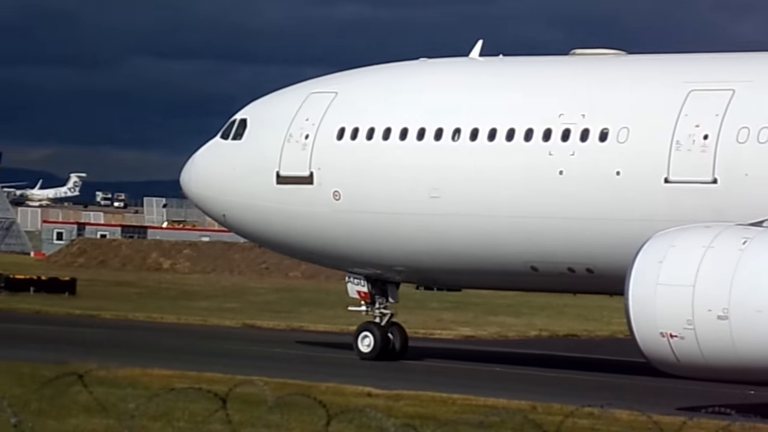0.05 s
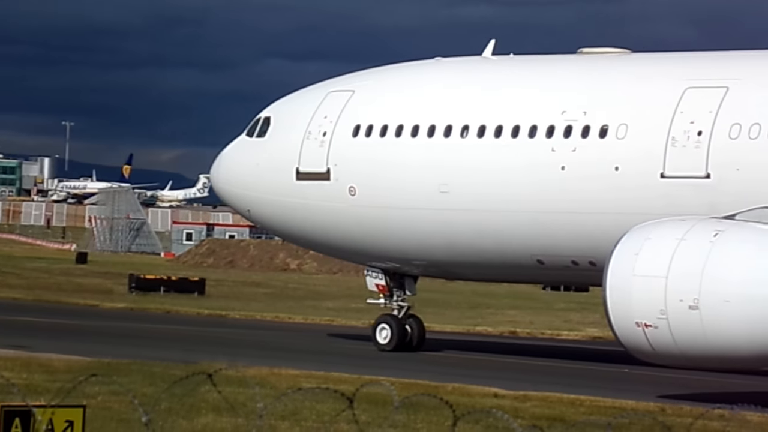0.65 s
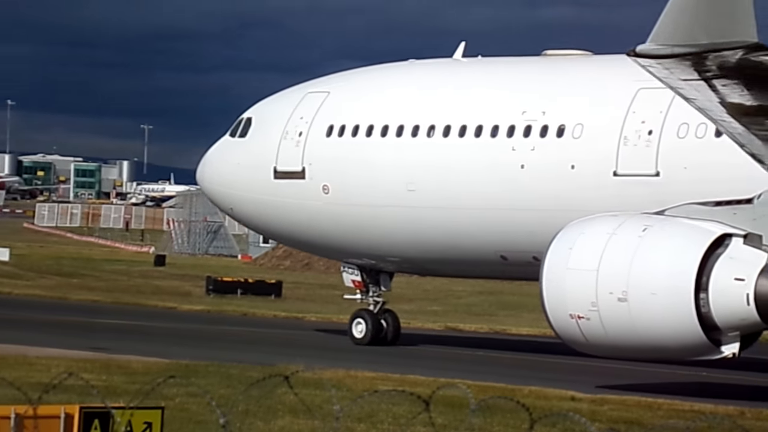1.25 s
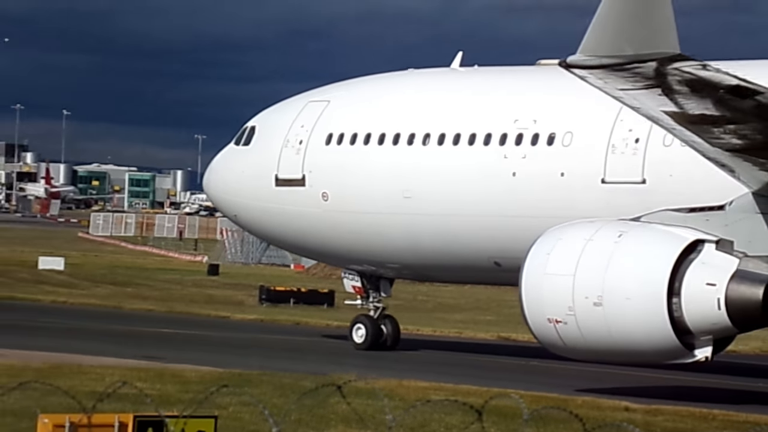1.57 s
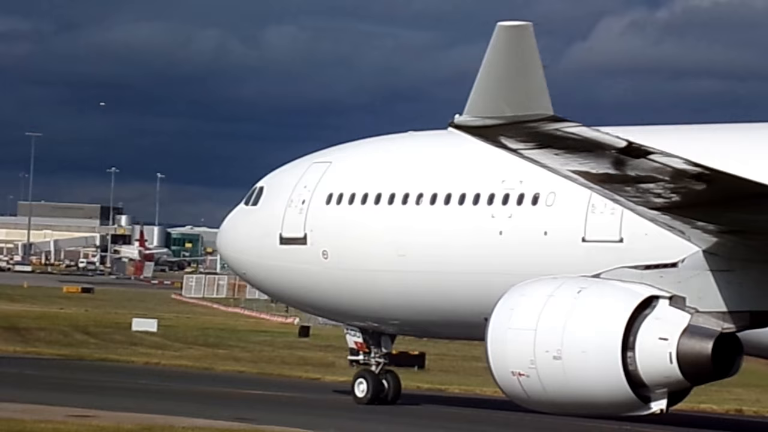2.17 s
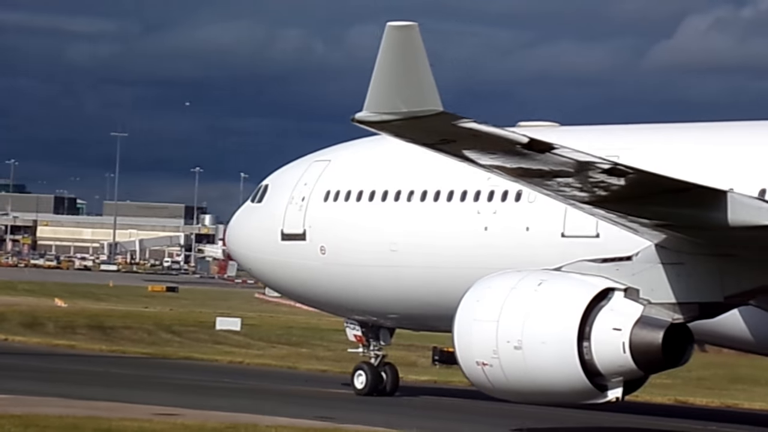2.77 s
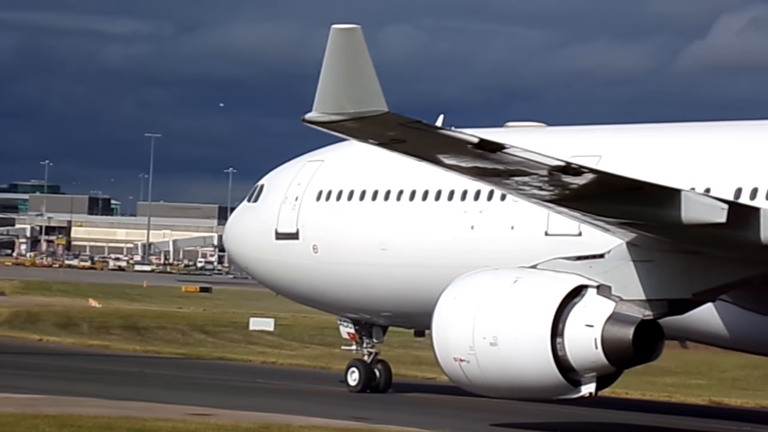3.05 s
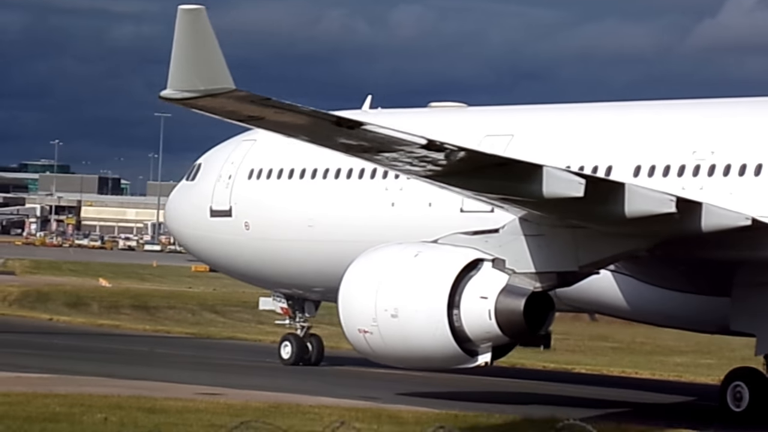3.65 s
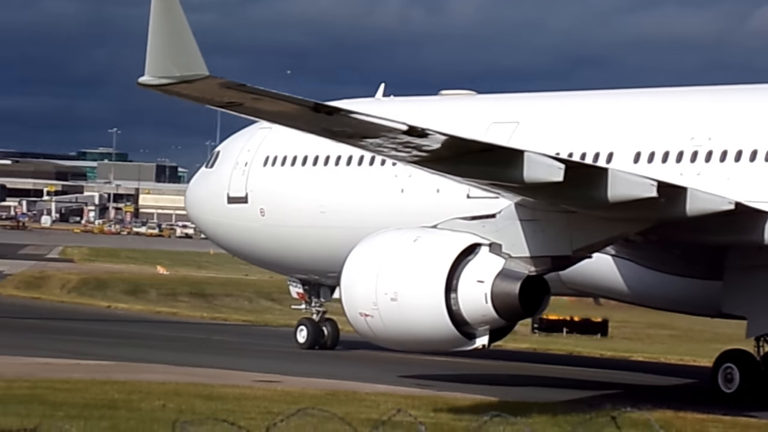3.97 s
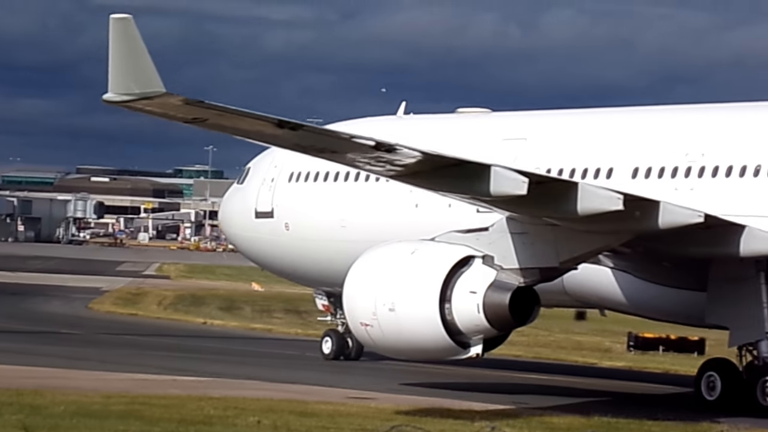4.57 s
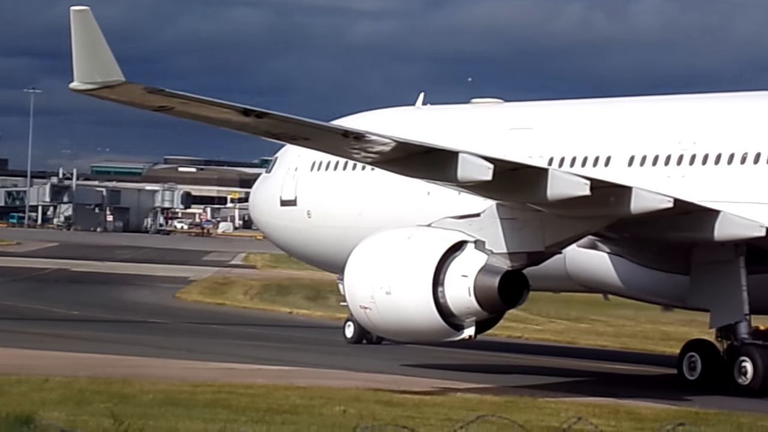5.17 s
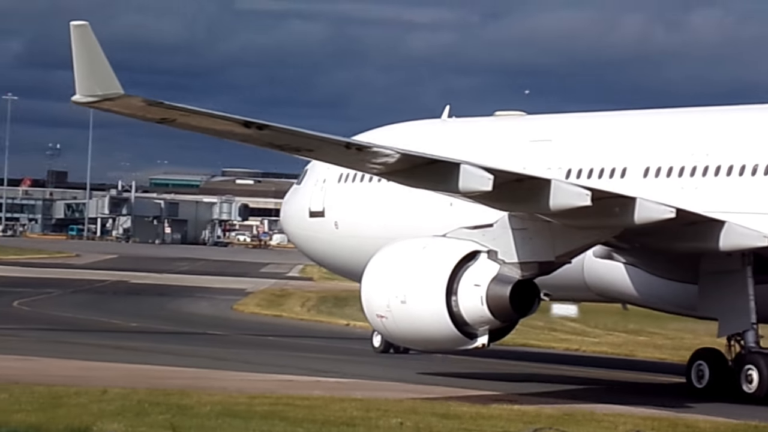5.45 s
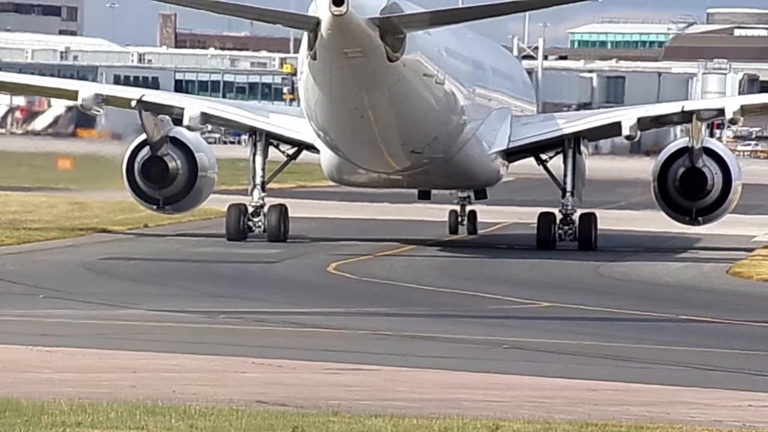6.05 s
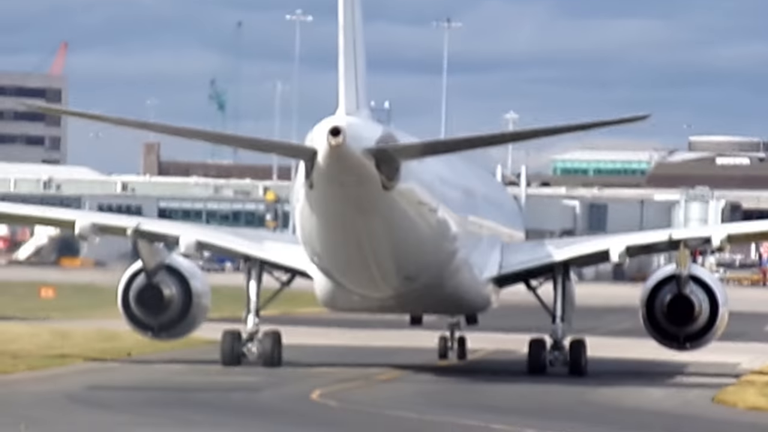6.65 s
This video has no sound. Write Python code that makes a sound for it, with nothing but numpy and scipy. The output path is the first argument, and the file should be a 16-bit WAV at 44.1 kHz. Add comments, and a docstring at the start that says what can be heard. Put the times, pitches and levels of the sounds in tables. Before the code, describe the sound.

A twin-engined airliner taxis close past the microphone at an airport. Its engines give a loud, fluttering roar with a wavering hum and a hollow howl. A high, hissing whine stands out at first, then recedes as a piercing whistle swells in surges and slowly rises in pitch. Near the end the close sound cuts off abruptly, and a much quieter, dull roar of a distant aircraft fades in.

```python
"""On an airport taxiway a twin-engined airliner passes close by. Turbulent jet mixing rumbles and roars,
the engine hums, and directional blade tones beam past in turn while one spool winds up in a rising
whistle. Turbulent air makes it all flutter. The near sound breaks off at once, and the aircraft
fades in again far away, heard from behind as a dull roar."""
import sys
import numpy as np
from scipy import signal
from scipy.fft import rfft, irfft, next_fast_len
from scipy.io import wavfile
from scipy.ndimage import uniform_filter1d, minimum_filter1d

SR = 44100
rng = np.random.default_rng(int(sys.argv[2]) if len(sys.argv) > 2 else 0)


def inscribe(sig):
    """Save sig as 16-bit PCM at rate SR to the path in sys.argv[1].

    A 1-D sig is mono; a 2-D sig holds one channel per row.
    Samples are clipped to [-1, 1] before scaling.
    """
    pcm = np.round(np.clip(np.atleast_2d(sig).T, -1, 1) * 32767)
    wavfile.write(sys.argv[1], SR, pcm.astype(np.int16))


N = 304842
TIME = np.arange(N) / SR
BREAK_S = 5.803   # the near sound gives way to the distant one


def from_db(db):
    """Amplitude ratio of a level: a factor of ten per 20 dB."""
    return np.exp(np.asarray(db) * (np.log(10) / 20))


def rms_one(x):
    """Normalisation to unit mean power."""
    return x / np.sqrt(np.mean(np.abs(x) ** 2) + 1e-20)


def in_time(curve):
    """Linear interpolation of (time, value) points at every sample."""
    return np.interp(TIME, *np.transpose(curve))


def drift(rate_hz):
    """Low-passed Gaussian noise: a fluctuation of spread 1 that changes about rate_hz times a second."""
    step, settle = 20, 4000   # one value per 20 samples; the filter settles first
    pole = np.exp(-2 * np.pi * rate_hz * step / SR)
    white = rng.standard_normal(N // step + settle + 2)
    slow = signal.lfilter([1], [1, -2 * pole, pole * pole], white)[settle:]
    return np.interp(np.arange(N) / step, np.arange(len(slow)), rms_one(slow))


def noise(spectrum):
    """Spectral shaping: white noise takes on the colour of (frequency, relative level) points; rms 1."""
    hz, db = np.transpose(spectrum)
    size = next_fast_len(N)
    log_bins = np.log(np.maximum(np.fft.rfftfreq(size, 1 / SR), 1))
    gain = from_db(np.interp(log_bins, np.log(hz), db, left=-90, right=-90))
    return rms_one(irfft(rfft(rng.standard_normal(size)) * gain, size)[:N])


def phase_of(hz):
    """Phase in radians, the time integral of angular frequency."""
    return 2 * np.pi * np.cumsum(hz) / SR


def scattered(hz, width_hz, twinkle_db=2.15):
    """Scattering by turbulence broadens a tone into a narrow band and makes its level twinkle; rms 1."""
    phase = phase_of(hz)
    in_phase, quadrature = drift(width_hz), drift(width_hz)
    band = in_phase * np.cos(phase) + quadrature * np.sin(phase)
    evening_out = (in_phase ** 2 + quadrature ** 2 + .1) ** -.25   # partly flattens the envelope
    return rms_one(evening_out * from_db(twinkle_db * drift(9.7)) * band)


def beam(peak_s, half_s):
    """Directivity: a radiation lobe sweeps over the listener, 3 dB down at half_s from its peak."""
    off_axis = (TIME - peak_s) / half_s
    return 1 / np.sqrt(1 + off_axis ** 4)


def distant_aircraft(hum_hz, steady_db=-37.5, fade_depth_db=22.5, fade_in_s=.46, waver_rad=.5):
    """Far field behind the aircraft: a dull roar fades in, with a faint hum that swells once."""
    # spectrum of the distant roar: frequency_hz, relative_db
    far_spectrum = [(15, -35.5), (30, -17), (50, -5), (100, 0.5), (150, -3), (210, 3), (380, -1.5),
                    (720, 1), (850, -0.5), (1170, -0.5), (1420, -10.5), (2500, -7), (3250, -8),
                    (3900, -15.5), (4500, -16.5), (5300, -25), (5900, -36), (6700, -26.5), (7400, -31),
                    (8500, -41), (16000, -43)]
    level_db = steady_db - fade_depth_db * np.clip(1 - (TIME - BREAK_S) / fade_in_s, 0, 1)
    hum_rms = from_db(-12) + from_db(-9) * beam(peak_s=6.4, half_s=.079)
    faint_hum = np.sqrt(2) * hum_rms * np.sin(phase_of(hum_hz) + waver_rad * drift(4))
    return from_db(level_db) * (noise(far_spectrum) + faint_hum)


def airflow(band_flutter_db=.6, joint_flutter_db=.31):
    """Flow noise: air tearing over the blades rushes, hisses and sizzles; eddies modulate its level."""
    # spectra of the middle, high and highest bands of flow noise: frequency_hz, relative_db
    rush_spectrum = [(850, -20), (1150, 1.5), (1480, 4.5), (1620, -0.5), (1800, -2), (1960, 3), (2200, 2),
                     (2380, -3.5), (2620, 3.5), (3100, 2.5), (3600, -1), (4400, 0), (5200, -8), (6500, -35)]
    hiss_spectrum = [(3300, -42), (4500, -7), (5450, -5.5), (5950, -10.5), (6400, -6.5), (6700, 4),
                     (7000, 1.5), (7500, -9), (8200, -26), (9500, -32), (11000, -66.5)]
    sizzle_spectrum = [(7000, -33), (8400, -1.5), (9150, 5.5), (9600, -2), (10500, 0.5), (11300, -3),
                       (12200, -8), (13250, -8.5), (13650, -15.5), (16000, -22)]
    # envelope of the rushing air: time_s, relative_db
    rush_level = [(0.1, -25.5), (0.35, -27), (0.43, -21.5), (2.8, -23.5), (3.06, -21), (4.03, -24.5),
                  (4.76, -23), (5.56, -25), (5.7, -25)]
    # intake hiss, loud until the cowling turns away and shields it: time_s, relative_db
    intake_level = [(0.0, -22.0), (0.12, -22), (0.28, -26.5), (0.4, -23), (0.84, -17.5), (0.96, -22.5),
                    (1.64, -21.0), (1.76, -25.5), (3.64, -26), (4.24, -29), (4.44, -27.5), (5.76, -29)]
    intake_db = in_time(intake_level)
    flare_db = 2.5 * beam(peak_s=.79, half_s=.13)   # the fan goes by
    sizzle_db = -41 + .46 * (intake_db - np.mean(intake_db)) + flare_db
    bands = [(in_time(rush_level) + .63, rush_spectrum),
             (intake_db - .5, hiss_spectrum),
             (sizzle_db, sizzle_spectrum)]
    air = sum(from_db(db + band_flutter_db * drift(25)) * noise(spectrum) for db, spectrum in bands)
    return from_db(joint_flutter_db * drift(18)) * air


def whines(doppler):
    """Doppler shift: steady fan, compressor and turbine tones sink together as their lobes sweep by."""
    # blade tones before the shift: pitch_hz, width_hz, level_db, peak_s, half_s
    blade_tones = [(110, 3.04, -44.5, 3.2, 2.6), (472.5, 38, -27.5, 2.2, 0.58),
                   (489.4, 4.5, -28, 2.8, 1.44), (966, 29, -34.5, 3.2, 2.9), (931.5, 3.5, -25.5, .71, .14),
                   (997, 4, -29.5, 2.5, 1.8), (1312, 12, -36, 1.0, 1.2), (1305, 10, -38, 4.4, .6),
                   (1877, 9, -35, .6, .8), (1890, 30, -34, .7, .8), (2633, 10, -39, 3.0, 1.8),
                   (2784, 7, -38, 2.6, .6), (3283, 8, -43, 2.6, 1.7), (4402, 25, -30, .66, .2),
                   (4404, 7, -38, 2.0, .8), (4420, 12, -32.5, 4.86, .16), (4420, 8, -37, 4.6, 1.8),
                   (4910, 11, -41, 3.8, 3.5), (5408, 10, -46, 3.4, 1.0), (6630, 49, -22, 0.77, 0.64),
                   (6420, 84, -39.5, 0.98, 2.0), (8980, 70, -41, 0.83, 0.61)]
    return sum(from_db(db) * beam(peak_s, half_s) * scattered(hz * doppler, width_hz)
               for hz, width_hz, db, peak_s, half_s in blade_tones)


def rising_spool(start_hz=3895, climb_hz_per_s=108, climb_growth_hz_per_s2=8):
    """Blade-passing frequency follows shaft speed, so all rows of an accelerating spool glide up."""
    # radiation lobes of the main whistle, which add in power: peak_s, level_db, half_s
    lobes = [(3.34, -25, .06), (3.45, -30.5, .22), (3.98, -25.5, .07), (4.32, -30, .07), (5.66, -33.5, .14),
             (3.2, -40, 2.2)]
    # tones of another blade row and harmonics of the main whistle: blade_rate_multiple, width_hz, level_db,
    # peak_s, half_s
    companion_tones = [(31 / 40, 12, -38, 4.25, .2), (31 / 40, 12, -40, 5.3, .22), (62 / 40, 16, -32, 5.4, .08),
                       (2, 20, -47, 3.42, .12), (2, 30, -52, 4.4, 1.3), (2, 20, -47, 5.42, .07),
                       (2, 120, -44, 5.75, .09), (3, 900, -52, 5.75, .1)]
    blade_hz = start_hz + climb_hz_per_s * TIME + climb_growth_hz_per_s2 * TIME ** 2 / 2
    whistle_power = sum((from_db(db) * beam(peak_s, half_s)) ** 2 for peak_s, db, half_s in lobes)
    companions = sum(from_db(db) * beam(peak_s, half_s) * scattered(blade_hz * multiple, width_hz)
               for multiple, width_hz, db, peak_s, half_s in companion_tones)
    return np.sqrt(whistle_power) * scattered(blade_hz, width_hz=18) + companions


def exhaust(abeam_s=1.34, approach_db_per_s=3.5, recede_db_per_s=1.49, surge_db=1.14, throb_db=.84):
    """Turbulent jet mixing rumbles and roars, loudest abeam; the duct resonates in a howl near 700 Hz."""
    # spectra of the jet's three bands, lowest first, and of the duct: frequency_hz, relative_db
    deep_spectrum = [(15, -40), (28, -25), (48, -7.5), (70, -1), (100, 0), (135, -3), (220, -32)]
    rumble_spectrum = [(80, -25.5), (125, -9), (160, -7.5), (200, 0), (260, 0), (310, 3), (380, -27),
                       (600, -41)]
    roar_spectrum = [(220, -28), (330, 1.5), (400, -1.5), (470, 2.5), (560, -0.5), (660, 1.5), (770, -15),
                     (825, -8), (920, -2.5), (1050, -4), (1200, -10), (1700, -45.5)]
    howl_spectrum = [(560, -40), (635, -10), (675, -.5), (728, 0), (757, -4), (790, -22), (880, -45)]
    # envelope of the howl in the duct: time_s, level_db
    howl_level = [(0.0, -17.5), (0.88, -15.5), (1.08, -19.0), (1.28, -16), (2.2, -19.5), (2.4, -17.5),
                  (3.04, -22.5), (3.24, -16), (3.48, -19), (4.96, -19.5), (5.08, -22.0), (5.76, -23.5)]
    passing_db = np.minimum(approach_db_per_s * (TIME - abeam_s), recede_db_per_s * (abeam_s - TIME))
    jet = from_db(-23.5) * noise(rumble_spectrum) + from_db(-19) * noise(roar_spectrum)
    deep = from_db(-40.5) * noise(deep_spectrum)   # the longest waves spread evenly all round
    howl = from_db(in_time(howl_level) + throb_db * drift(18)) * noise(howl_spectrum)
    return from_db(surge_db * drift(25)) * (from_db(passing_db) * jet + deep) + howl


def engine_hum(hum_hz, waver_rad=.29, shimmer_db=.82):
    """Two phase-locked harmonics swell and fade separately; the octave's phase wavers twice as far."""
    # envelopes of the fundamental and of its octave: time_s, level_db
    fundamental_level = [(0.0, -15.5), (0.52, -14.5), (0.88, -26.0), (1.0, -24), (1.12, -27.5),
                         (1.88, -17.5), (2.2, -24), (2.36, -13), (2.64, -18.0), (2.76, -15.0),
                         (4.04, -15.5), (4.24, -25.5), (4.68, -16.5), (5.36, -16), (5.56, -23.5),
                         (5.76, -23.5)]
    octave_level = [(0.0, -17), (0.52, -26.5), (0.96, -15), (1.88, -24.5), (2.0, -17), (2.6, -20.5),
                    (2.88, -31), (3.36, -24.0), (4.0, -18.5), (4.2, -29), (4.32, -21.5), (4.84, -29),
                    (4.96, -37), (5.08, -31.0), (5.76, -36)]
    phase = phase_of(hum_hz) + waver_rad * drift(2.4)
    fundamental = from_db(in_time(fundamental_level) + shimmer_db * drift(6.9)) * np.sin(phase)
    octave = from_db(in_time(octave_level) + shimmer_db * drift(16)) * np.sin(2 * phase)
    return np.sqrt(2) * (fundamental + octave)


def scene(hum_start_hz=313.0, sag_hz_per_s=.66):
    """Superposition of the near sources as the pitch sinks, then an abrupt cut to the distant aircraft."""
    hum_hz = hum_start_hz - sag_hz_per_s * np.minimum(TIME, BREAK_S)
    doppler = hum_hz / np.mean(hum_hz)
    near = engine_hum(hum_hz) + whines(doppler) + rising_spool() + exhaust() + airflow()
    return np.where(TIME < BREAK_S, near, distant_aircraft(hum_hz))[None]


def record(dry, limiter_s=.006, cutoff_hz=15730):
    """Filtering and limiting: notches colour the sound, the highest peaks are ducked, the top is cut."""
    # narrow notch filters cut dips into the sound: centre_hz, width_hz
    notches = [(3700, 150), (7885, 380), (8080, 380), (11725, 330)]
    for hz, width_hz in notches:
        dry = signal.lfilter(*signal.iirnotch(hz, hz / width_hz, fs=SR), dry)
    span = int(limiter_s * SR)
    needed_gain = 1 / np.maximum(np.abs(dry), 1)
    smooth_gain = uniform_filter1d(minimum_filter1d(needed_gain, size=span), size=span)
    low_pass = signal.ellip(12, .1, 90, cutoff_hz, fs=SR, output="sos")
    return signal.sosfilt(low_pass, smooth_gain * dry)


dry = scene()
out = record(dry)
inscribe(out)
```